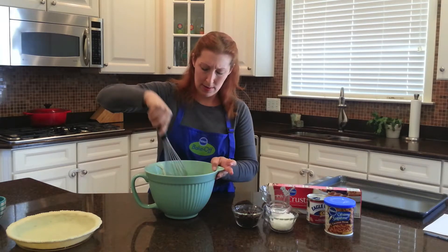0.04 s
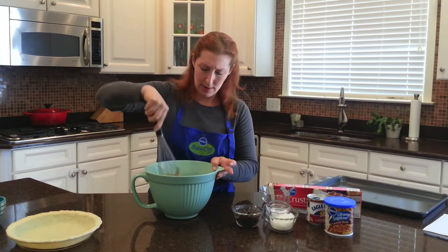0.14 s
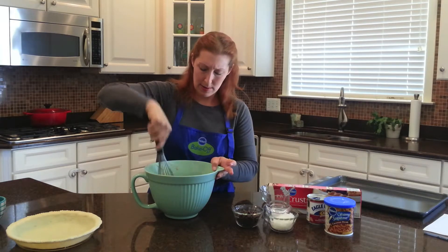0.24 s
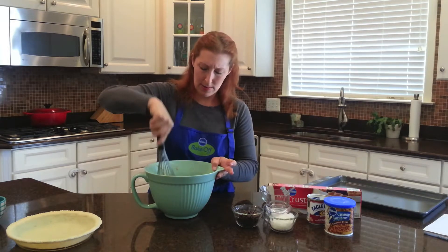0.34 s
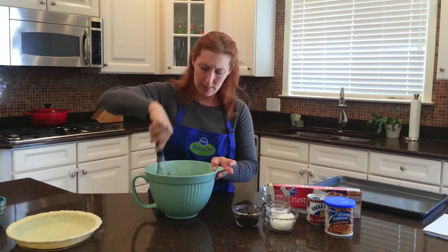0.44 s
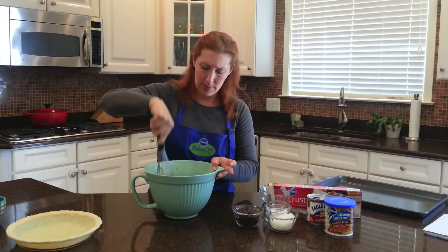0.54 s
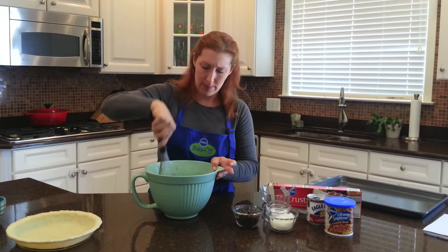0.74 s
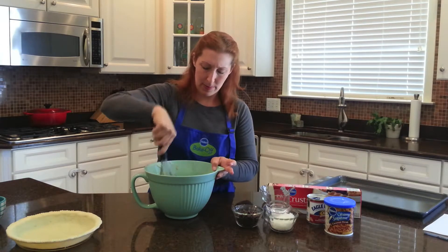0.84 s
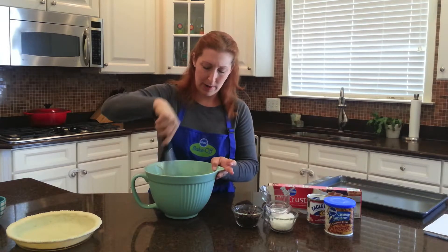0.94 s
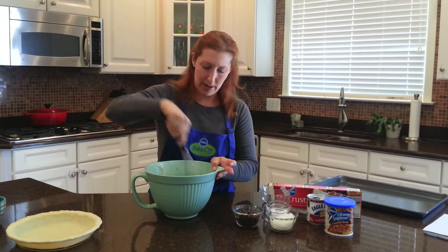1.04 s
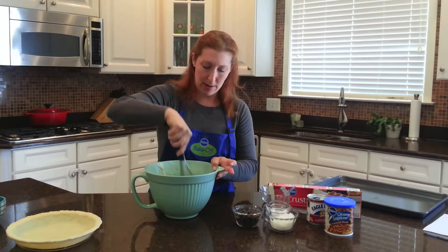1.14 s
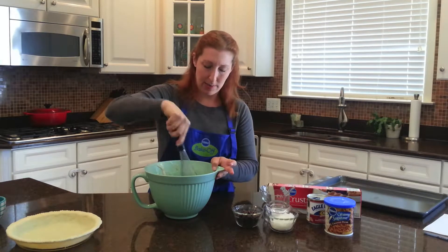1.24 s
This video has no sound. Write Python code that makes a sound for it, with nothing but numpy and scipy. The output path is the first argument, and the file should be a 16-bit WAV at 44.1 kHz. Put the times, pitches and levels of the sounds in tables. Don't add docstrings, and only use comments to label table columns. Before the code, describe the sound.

A wire whisk stirs thick filling in a plastic bowl, a few metres from a stereo microphone in a hard, echoing kitchen. Faint hum and hiss open; bright wire clicks cluster at 0.2 seconds. Soft swishes pass around 0.45 to 0.8, a light wall knock and low slops near 0.9, a hard rim knock at 1.06 with heavier churning and wet blips, then the loudest swish at 1.3.

```python
import sys
import numpy as np
from scipy import signal
from scipy.fft import rfft, irfft, next_fast_len
from scipy.io import wavfile
from scipy.ndimage import uniform_filter1d

SR = 44100
rng = np.random.default_rng(int(sys.argv[2]) if len(sys.argv) > 2 else 0)


def generate_wav(sig):
    pcm = np.round(np.clip(np.atleast_2d(sig).T, -1, 1) * 32767).astype(np.int16)
    wavfile.write(sys.argv[1], SR, pcm)


def attenuation_scalar(level_db):
    decades = np.asarray(level_db, float) / 20
    return 10 ** decades


N = 57330

# frequency in Hz, level in dB.
AIR_COLOUR = [(20, -10), (60, -9), (150, -12.5), (215, -2), (300, -13.5), (480, -7.5), (800, -18.5),
              (3000, -24.5), (7000, -21.5), (14300, -27), (15000, -60)]
# frequency in Hz, correlation from 0 to 1.
LEFT_RIGHT_LIKENESS = [(60, 0.63), (300, .8), (1000, 0.13), (4000, 0.12), (12000, 0.38)]
AIR_DB, HUM_DB, HUM_HZ = -58, -66, 59

# frequency in Hz, t60 in seconds.
ROOM_DECAY = [(200, 0.9), (1400, 0.5), (3700, 0.43), (7000, 0.45), (10000, 0.29), (14000, 0.38)]
ROOM_LIKENESS, ROOM_DELAY_S = 0.26, 0.0017

# peak in seconds, rise in seconds, t60 in seconds, level in dB.
CHURNS = [
    (0.005, 0.0053, 0.081, -60),
    (0.735, 0.018, 0.12, -54),
    (0.93, 0.057, 0.23, -52.5),
    (1.02, 0.054, 0.038, -57.5),
    (1.11, 0.06, 0.39, -44.5),
    (1.17, 0.09, 0.68, -56.5),
    (1.3, 0.017, .1, -59.5),
]
# frequency in Hz, level in dB.
CHURN_COLOUR = [(60, -8), (150, -3.5), (240, 1.5), (330, -4.5), (470, 3), (700, -5.5), (900, -11),
                (1500, -78)]
# start in seconds, pitch in Hz, level in dB.
FOLDS = [(0.234, 362, -29.5), (0.264, 128, -50), (0.704, 267, -30), (0.729, 287, -38), (0.877, 333, -36.5),
         (0.925, 488, -25), (0.968, 500, -37), (1.043, 262, -34), (1.063, 429, -25.5), (1.103, 440, -24.5),
         (1.106, 201, -39.5), (1.143, 247, -43), (1.154, 420, -26), (1.169, 267, -32.5), (1.197, 553, -34),
         (1.29, 422, -32)]
FOLD_RISE_S, FOLD_CYCLES, FOLD_ROOM_DB = 0.0047, 4.6, -6
# peak in seconds, rise in seconds, t60 in seconds, level in dB.
SWISHES = [
    (0.2, 0.015, 0.024, -53),
    (0.445, 0.06, 0.24, -48),
    (0.485, 0.098, 0.18, -55.5),
    (0.539, .012, 0.07, -55.5),
    (0.633, 0.021, 0.22, -49.5),
    (0.814, 0.0034, 0.18, -46.5),
    (0.887, 0.037, 0.45, -55.5),
    (1.048, 0.0081, 0.065, -100.5),
    (1.3, 0.013, 0.086, -33),
]
# frequency in Hz, level in dB.
SWISH_COLOUR = [(300, -45.5), (700, -24), (2000, -14.5), (4000, -12.5), (7100, -4.5), (10000, -14.5),
                (14200, -15.5), (15000, -46)]

# frequency in Hz, width in Hz, level in dB.
LOOP_MODES = [(380, 63, -17.5), (540, 66, -32.5), (750, 58, -19), (1060, 25, -24), (2258, 130, 0.5),
              (3158, 117, -1), (3757, 125, 4), (5110, 130, 4), (5778, 130, -3.5), (6800, 390, 16.5),
              (9050, 300, -21.5), (13860, 400, -26.5)]
# frequency in Hz, width in Hz, level in dB.
SNAP_MODES = [(2382, 440, -5), (3400, 500, -13.5), (4773, 184, -6), (5500, 128, -6), (6393, 180, -0.5),
              (6900, 610, 4.5), (7540, 530, -11.5), (8940, 730, 0.5), (10180, 1420, -4),
              (12260, 1400, -6.5), (13970, 630, -13)]
# frequency in Hz, width in Hz, level in dB.
RIM_MODES = [(1074, 103, -21), (1620, 310, -29), (1995, 414, -2.5), (2767, 130, -14), (3735, 220, 1.5),
             (4180, 130, -21), (5333, 203, -1.5), (5488, 19, -19), (6230, 690, -5), (7290, 440, 4.5),
             (7260, 90, -14.5), (8390, 370, 1.5), (10450, 290, -9), (12400, 480, -18)]
# frequency in Hz, width in Hz, level in dB.
WALL_MODES = [(1096, 177, -3), (1940, 332, 1), (2397, 330, 2), (4150, 450, 4), (4800, 370, 2),
              (7000, 610, -2.5), (8140, 560, -5), (9800, 670, -14)]
# frequency in Hz, width in Hz, level in dB.
PING_MODES = [(2205, 41, -14), (1040, 250, -23.5)]
# start in seconds, level in dB, left-over-right pan in dB.
LOOP_TAPS = [
    (0.209, -30, -5.5),
    (0.2138, -11, 2.5),
    (1.2935, -28.5, 6),
]
# start in seconds, level in dB, left-over-right pan in dB.
SNAP_TAPS = [
    (0.2217, -10.5, -15.5),
    (0.2231, -11, 11.5),
    (0.444, -48, 24.5),
    (0.634, -43, -7),
    (0.8125, -62, -27),
    (1.2985, -40.5, -9.5),
]
# start in seconds, level in dB, left-over-right pan in dB.
RIM_TAPS = [
    (1.0605, -38.5, 20.5),
    (1.0633, -12, 1.5),
    (1.2855, -38.5, -7.5),
]
# start in seconds, level in dB, left-over-right pan in dB.
WALL_TAPS = [
    (0.875, -44.5, 5),
    (0.8899, -28.5, 3),
    (0.913, -60, 4),
]
# start in seconds, level in dB, left-over-right pan in dB.
PING_TAPS = [
    (0.963, -44, 0),
    (0.645, -54, 0),
    (1.085, -35, 0),
]
CONTACT_S, SPREAD_S = 0.00019, 0.0008
SIDE_SCATTER_DB, FLUTTER_LOSS_DB = 4, 6.5
SHADOW_HZ, SHADOW_DB = 7530, 12

KNEE_DB, SLOPE, DEPTH_DB = -44.5, 0.79, 20
SENSE_S, SENSE_HZ = 0.018, 298
MIC_HZ, TOP_HZ = 14300, 15700


def along(points, hz):
    f, v = np.transpose(points)
    return np.interp(np.log(hz + 1), np.log(f + 1), v)


def filtered(x, response):
    m = next_fast_len(N + SR // 2)
    return irfft(rfft(x, m) * response(np.fft.rfftfreq(m, 1 / SR)), m)[..., :N]


def rush(colour):
    def mid_side(hz):
        angle = np.arccos(np.clip(along(LEFT_RIGHT_LIKENESS, hz), -1, 1)) / 2
        return attenuation_scalar(along(colour, hz)) * np.array([np.cos(angle), np.sin(angle)])

    mid, side = filtered(rng.standard_normal((2, N)), mid_side)
    pair = np.array([mid + side, mid - side])
    return pair / pair.std()


def kitchen():
    hum = np.sin(2 * np.pi * HUM_HZ * np.arange(N) / SR)
    return attenuation_scalar(AIR_DB) * rush(AIR_COLOUR) + attenuation_scalar(HUM_DB) * hum


def room(x):
    hz, t, z = signal.stft(rng.standard_normal((2, SR)), SR, nperseg=256)
    decay = attenuation_scalar(-60 * t / along(ROOM_DECAY, hz)[:, None])
    a, b = signal.istft(z * decay, SR, nperseg=256)[1]
    angle = np.arccos(np.clip(ROOM_LIKENESS, 0, 1)) / 2
    mid, side = np.cos(angle) * a, np.sin(angle) * b
    tail = np.array([mid + side, mid - side])
    tail = tail * (1 - np.exp(-np.arange(len(a)) / SR / ROOM_DELAY_S))
    return signal.fftconvolve(x, tail / np.linalg.norm(tail[0]), axes=1)[:, :N]


def swells(rows, colour, grain_db, size):
    t = np.arange(N) / SR
    shape = np.zeros(N)
    for peak, rise, t60, db in rows:
        fall_db = 60 * (t - peak).clip(0) / t60
        rise_db = 20 * (peak - t).clip(0) / rise
        shape += attenuation_scalar(db - fall_db - rise_db)
    wander = uniform_filter1d(rng.standard_normal(N), size=size) * np.sqrt(size)
    return shape * attenuation_scalar(grain_db * wander) * rush(colour)


def churn():
    return swells(CHURNS, CHURN_COLOUR, grain_db=2, size=400)


def slops():
    x, t = np.zeros(N + SR), np.arange(SR // 8) / SR
    for s, hz, db in FOLDS:
        decay = attenuation_scalar(db - 60 * t * hz / FOLD_CYCLES / 2)
        onset = 1 - np.exp(-(t / FOLD_RISE_S) ** 2)
        x[round(s * SR):][:len(t)] += decay * onset * np.sin(2 * np.pi * hz * t)
    return x[:N] + attenuation_scalar(FOLD_ROOM_DB) * room(x[None, :N])


def swish():
    return swells(SWISHES, SWISH_COLOUR, grain_db=1.5, size=60)


def strike(modes, lag_s):
    t = np.arange(SR // 10) / SR
    hz, width, level = np.transpose(modes)[:, :, None]
    start, lean = rng.random((2, len(modes), 1))
    lag = np.array([lag_s, 0])[:, None, None]
    late = (t - SPREAD_S * start ** 2 - lag).clip(0)
    scatter_db = SIDE_SCATTER_DB * (2 * lean - 1) * np.array([1, -1])[:, None, None]
    decay = np.exp(-np.pi * width * late)
    onset = 1 - np.exp(-(late / CONTACT_S) ** 2)
    phase = rng.random((len(modes), 1))
    wave = np.sin(2 * np.pi * (hz * late + phase))
    ring = (attenuation_scalar(level + scatter_db) * decay * onset * wave).sum(axis=1)
    return ring / np.abs(ring).max()


def flutter(x, gap_s, db):
    jitter = rng.normal(0, 0.0003, (6, 1, 1)) + rng.normal(0, 0.00002, (6, 2, 1))

    def echoes(hz):
        total = 1
        for k in range(6):
            delay = (k + 1) * gap_s + jitter[k]
            total = total + attenuation_scalar(db - FLUTTER_LOSS_DB * k) * np.exp(-2j * np.pi * hz * delay)
        return total

    return filtered(x, echoes)


def port(hz):
    low_cut = (1j * hz / 300 / (1 + 1j * hz / 300)) ** 2
    shadow_db = SHADOW_DB / (1 + (SHADOW_HZ / (hz + 1)) ** 8)
    return low_cut * attenuation_scalar(np.outer([-0.5, 0.5], shadow_db))


def taps(rows, modes, lag_s, flutter_s, flutter_db, room_db):
    out = np.zeros((2, N))
    for s, db, pan_db in rows:
        ring = strike(modes, lag_s) * attenuation_scalar(db + np.array([[pan_db / 2], [-pan_db / 2]]))
        direct = np.pad(ring, ((0, 0), (round(s * SR), N)))[:, :N]
        out += flutter(direct, flutter_s, flutter_db) + attenuation_scalar(room_db) * room(direct)
    return filtered(out, port)


def clicks():
    loops = taps(LOOP_TAPS, LOOP_MODES, lag_s=0.00006, flutter_s=0.0059, flutter_db=-13.5, room_db=5)
    snaps = taps(SNAP_TAPS, SNAP_MODES, lag_s=0.00007, flutter_s=0.0066, flutter_db=-3.5, room_db=2)
    rim = taps(RIM_TAPS, RIM_MODES, lag_s=0.00004, flutter_s=0.0066, flutter_db=-1.5, room_db=8)
    wall = taps(WALL_TAPS, WALL_MODES, lag_s=0.00004, flutter_s=0.0047, flutter_db=-3, room_db=3)
    pings = taps(PING_TAPS, PING_MODES, lag_s=0.00004, flutter_s=0.006, flutter_db=-32, room_db=-10)
    return loops + snaps + rim + wall + pings


def scene():
    return kitchen() + churn() + slops() + swish() + clicks()


def band_limit(x):
    return signal.sosfilt(signal.butter(12, 15780, fs=SR, output="sos"), x)


def record(dry):
    size = round(SENSE_S * SR)
    sensed = filtered(dry, lambda hz: hz / np.hypot(hz, SENSE_HZ))
    power = (sensed ** 2).mean(axis=0)
    power = uniform_filter1d(uniform_filter1d(power, size), size)
    level_db = 10 * np.log10(np.abs(power) + 1e-12)
    gain_db = np.clip(SLOPE * (level_db - KNEE_DB), -DEPTH_DB, 0)
    mix = filtered(dry * attenuation_scalar(gain_db), lambda hz: (hz < TOP_HZ) / np.sqrt(1 + (hz / MIC_HZ) ** 40))
    return band_limit(mix)


dry = scene()
out = record(dry)
generate_wav(out)
```